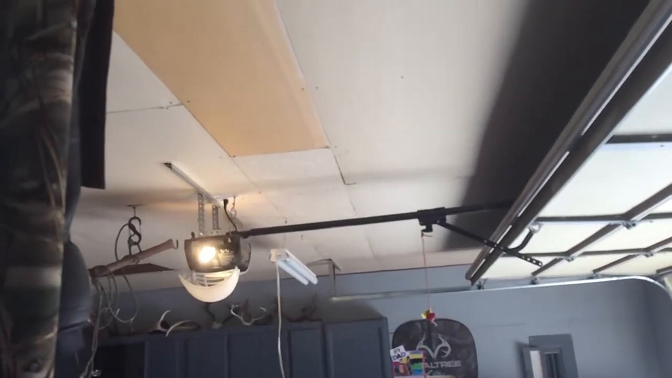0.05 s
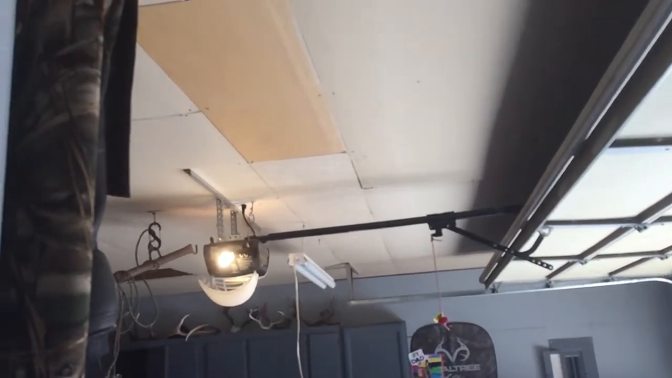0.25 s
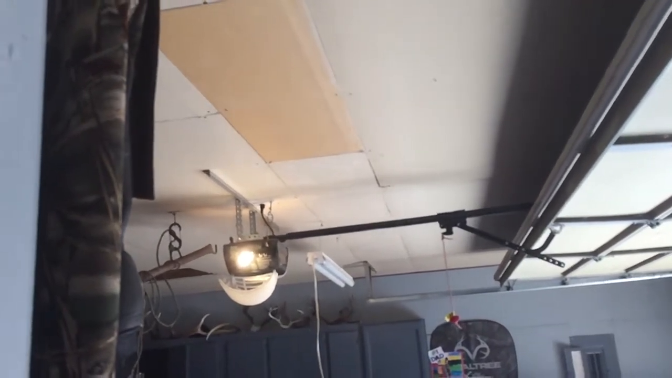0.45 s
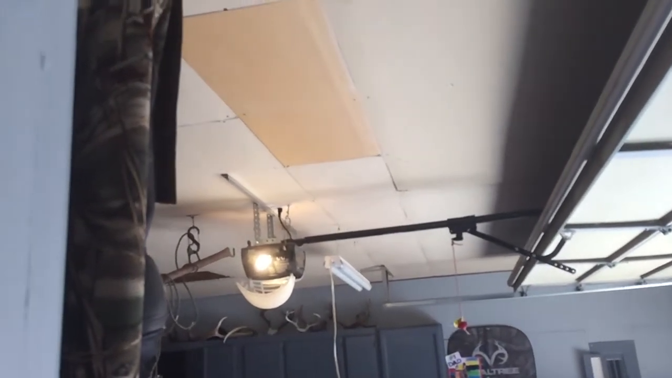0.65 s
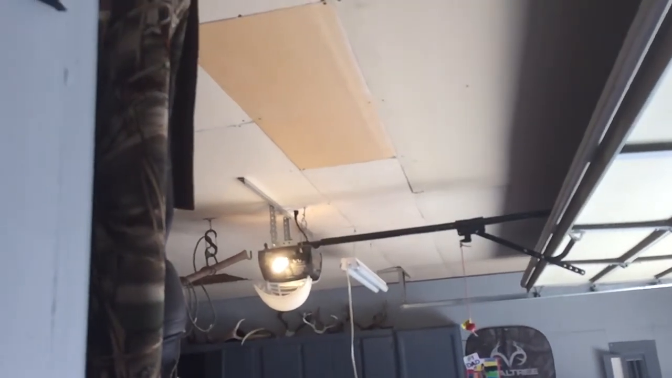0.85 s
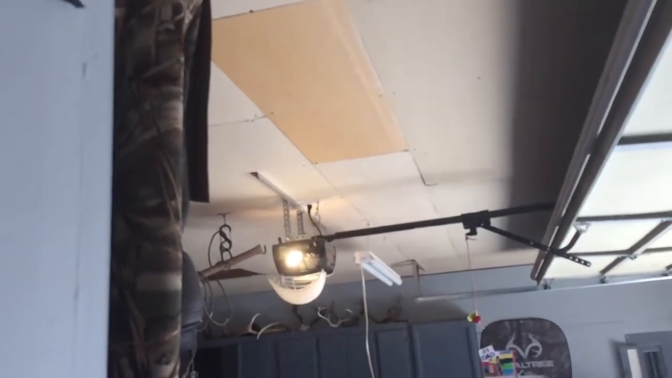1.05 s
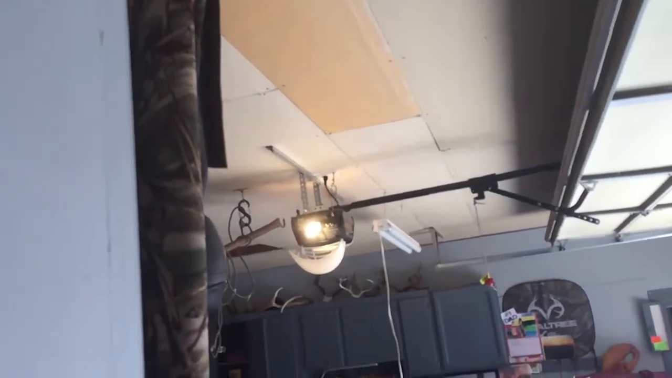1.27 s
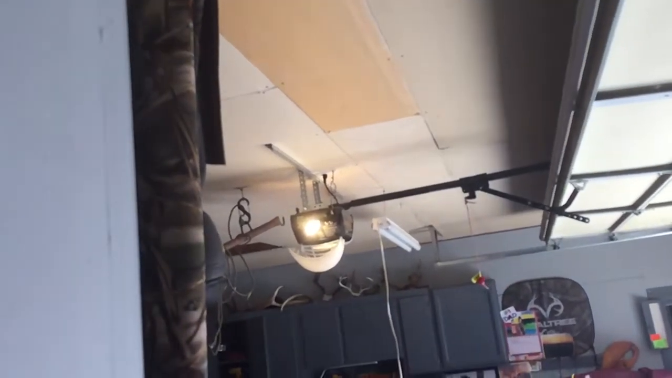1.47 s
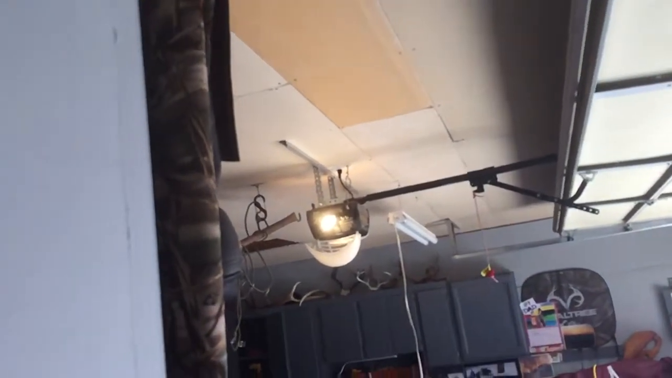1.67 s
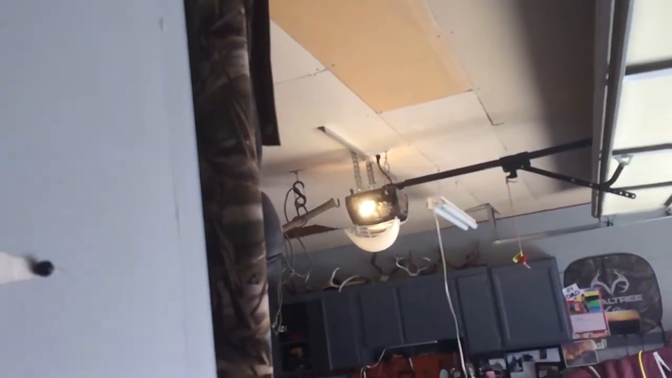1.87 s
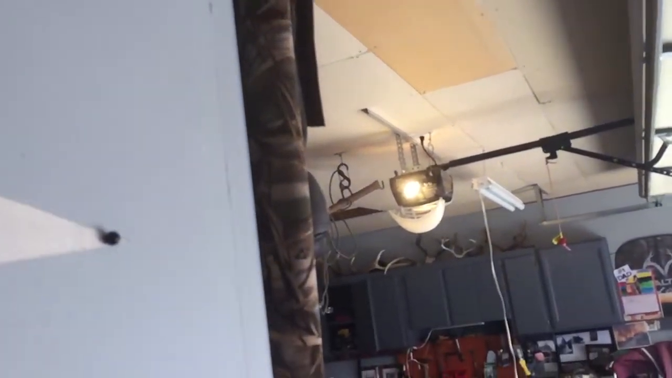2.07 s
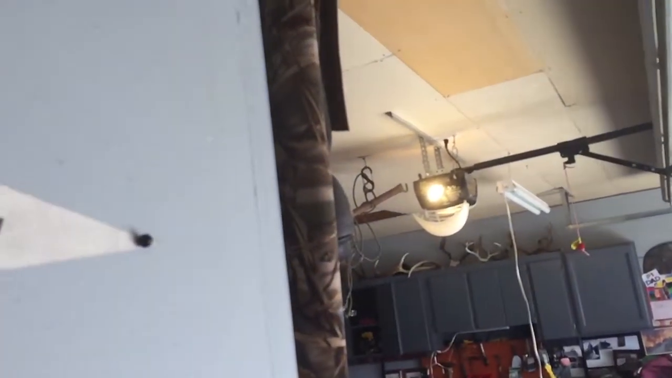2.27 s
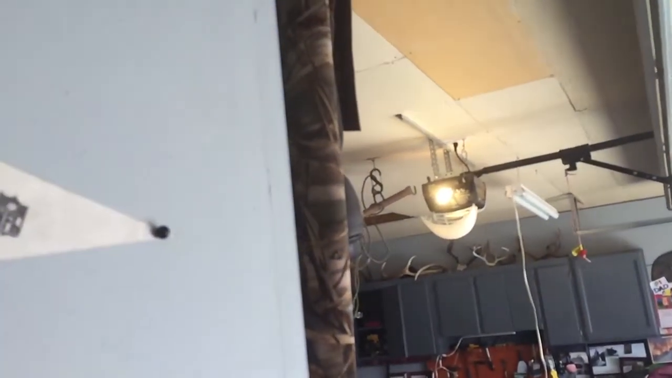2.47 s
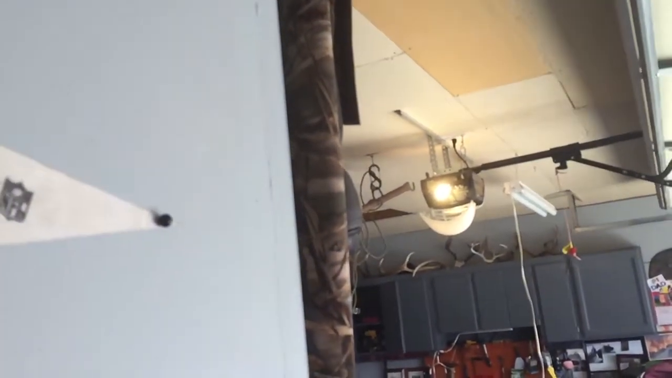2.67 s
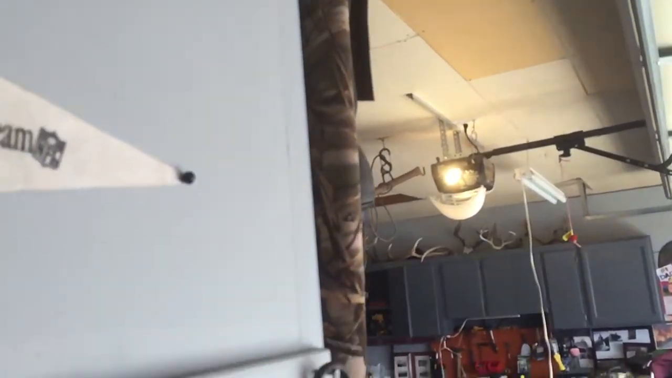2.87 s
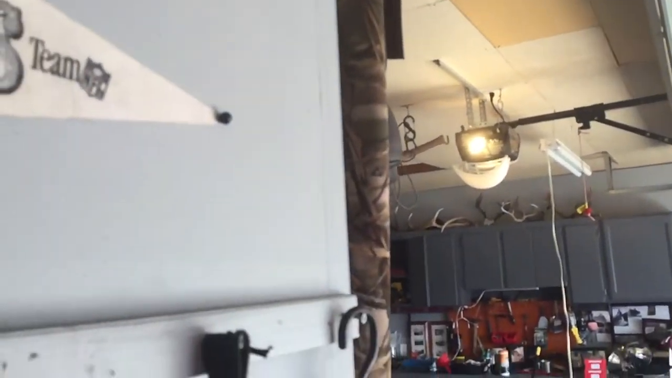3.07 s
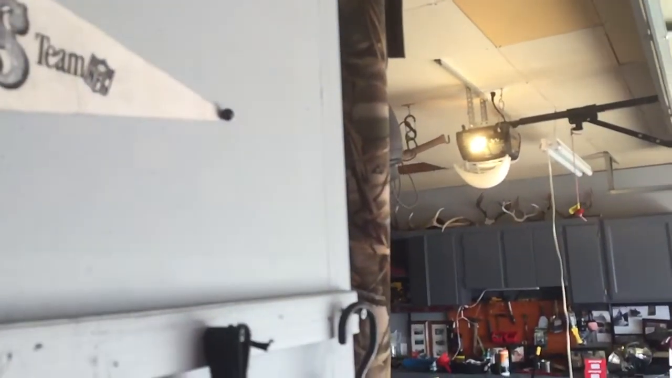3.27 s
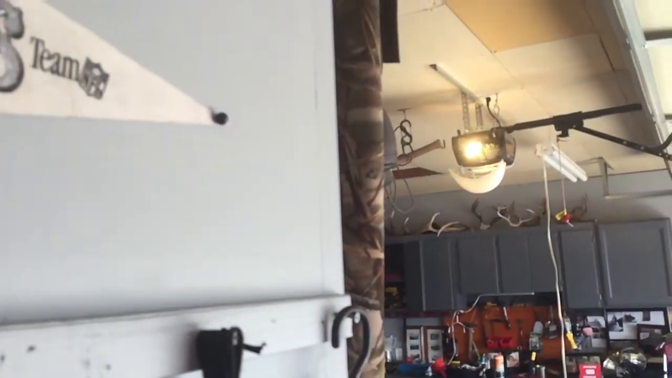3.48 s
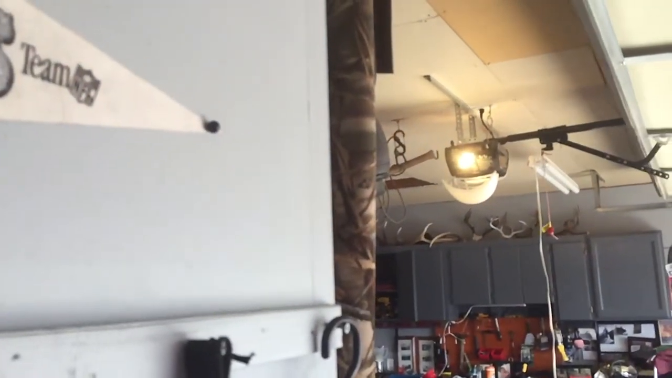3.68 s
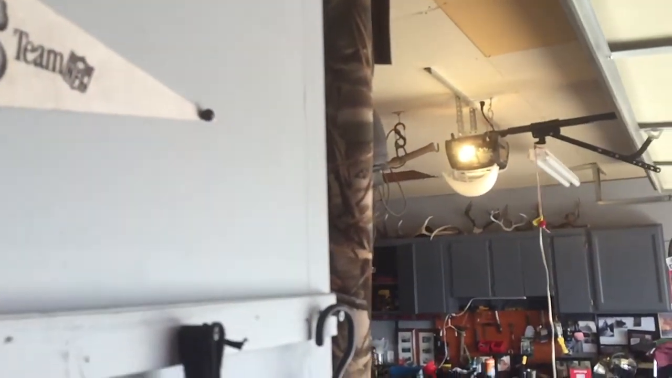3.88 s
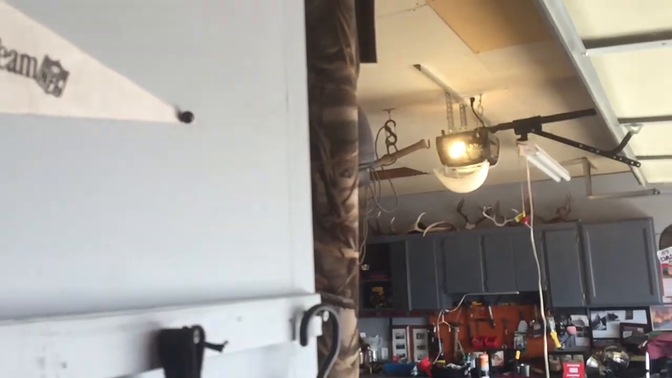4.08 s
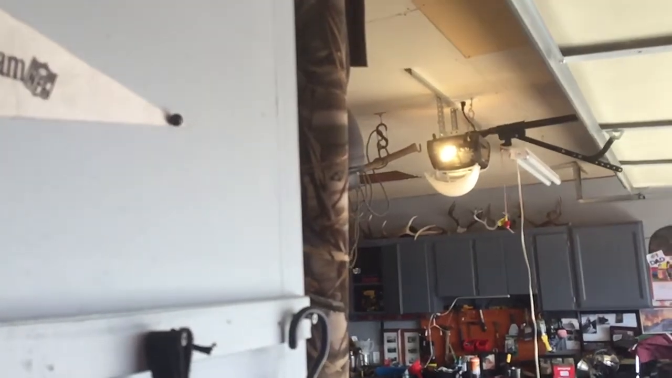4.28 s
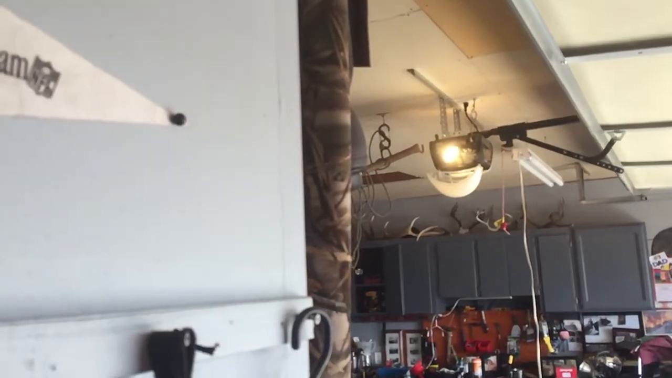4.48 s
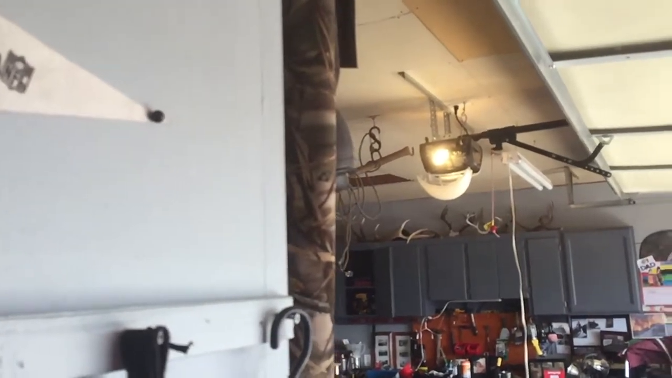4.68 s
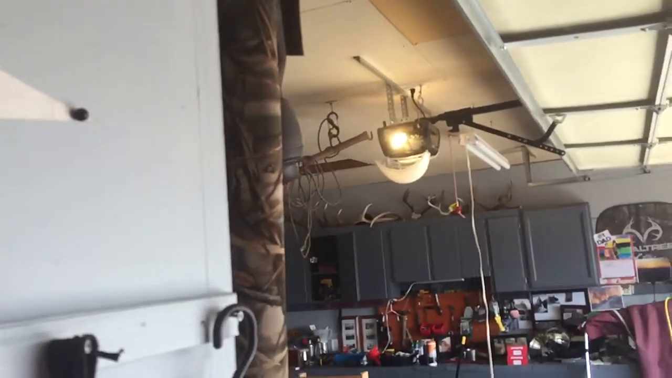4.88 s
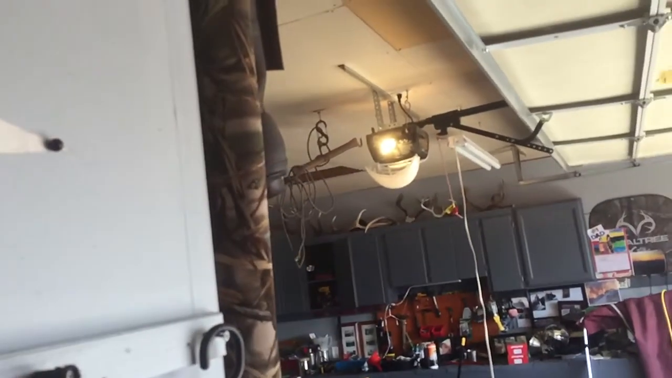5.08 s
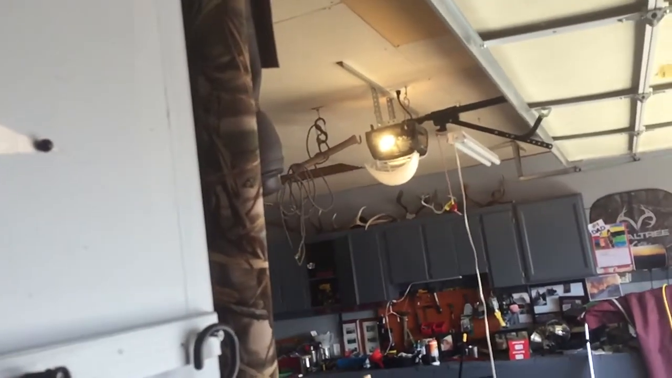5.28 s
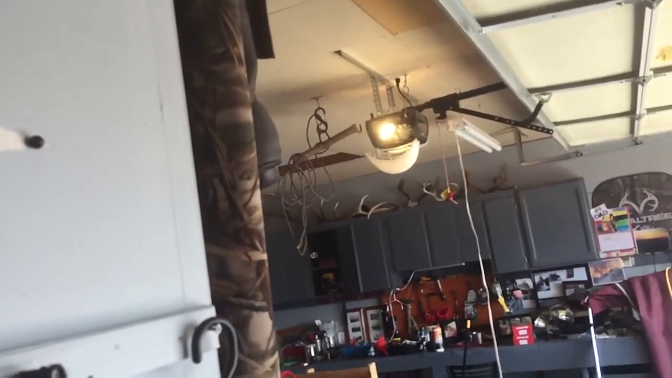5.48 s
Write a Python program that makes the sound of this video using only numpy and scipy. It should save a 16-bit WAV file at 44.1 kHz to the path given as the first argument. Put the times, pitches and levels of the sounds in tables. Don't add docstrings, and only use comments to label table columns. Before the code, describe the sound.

A handheld microphone picks up a garage door already moving: a strong mains-like motor hum, rumbling panels, dry roller and chain friction, scattered raps and dull thuds. A clanking burst passes about a quarter of the way through. After more uneven clicks, a cluster of thuds and bracket rattles marks the stop; the motor drops away quickly, leaving faint settling knocks and a short-reverberating quiet garage.

```python
import sys
import numpy as np
from scipy import signal
from scipy.fft import rfft, irfft, next_fast_len
from scipy.io import wavfile
from scipy.ndimage import uniform_filter1d, map_coordinates

SR = 44100
rng = np.random.default_rng(int(sys.argv[2]) if len(sys.argv) > 2 else 0)


def voltage_ratio(decibels):
    exponent = np.asarray(decibels, float) / 20
    return 10 ** exponent


def generate_wav(sig):
    pcm = np.round(np.clip(np.atleast_2d(sig).T, -1, 1) * 32767).astype(np.int16)
    wavfile.write(sys.argv[1], SR, pcm)


N = 244314


def unit(x):
    return x / np.sqrt(np.mean(x ** 2) + 1e-20)


def along(points, hz):
    f, v = np.transpose(points)
    return np.interp(np.log(hz + 1), np.log(f + 1), v)


def curves(rows):
    s, *columns = np.transpose(rows)
    return [np.interp(np.arange(N) / SR, s, column) for column in columns]


def wobble(rate):
    knots = rng.standard_normal(int(N * rate / SR) + 4)
    return map_coordinates(knots, [np.arange(N) * rate / SR])


def bumps(times, levels_db, t60s, rise):
    t = np.clip(np.arange(N) / SR - np.asarray(times)[:, None], 0, None)
    fall_db = np.asarray(levels_db)[:, None] - 60 * t / np.maximum(t60s, .02)[:, None]
    return np.sqrt((voltage_ratio(2 * fall_db) * (1 - np.exp(-t / rise)) ** 2).sum(0))


def filtered(x, response):
    m = next_fast_len(N + 8192)
    return unit(irfft(rfft(x, m) * response(np.fft.rfftfreq(m, 1 / SR)), m)[:N])


def band(spectrum, hz):
    return voltage_ratio(along(spectrum, hz)) * (hz > spectrum[0][0]) * (hz < spectrum[-1][0])


def coloured(spectrum, x=None):
    return filtered(rng.standard_normal(N) if x is None else x, lambda hz: band(spectrum, hz))


def grind(rate, spread_db, share, patchy_db):
    sizes = (rng.random(N) < rate / SR) * voltage_ratio(spread_db * np.minimum(rng.exponential(1, N), 3))
    puffs = signal.lfilter([1], [1, -np.exp(-1 / (.004 * SR))], sizes)
    z = signal.stft(rng.standard_normal(N), nperseg=1024)[2]
    rings = uniform_filter1d(rng.standard_normal(z.shape), size=2, axis=0)
    rings = uniform_filter1d(rings, size=9, axis=1)
    noise = signal.istft(z * voltage_ratio(patchy_db * unit(rings)), nperseg=1024)[1][:N]
    return noise * (1 + share * unit(puffs))


# start_s, hum_db, strain_db
MOTOR_LOAD = [(0, -29, -2), (.41, -28, -5.5), (.76, -29.5, 6.5), (1.21, -26.5, -2), (2.27, -28, 1.5),
              (2.32, -30, 3), (2.82, -29.5, 5.5), (2.96, -31, 7), (3.37, -29, 7), (3.48, -30.5, 7.5),
              (3.92, -31, 11), (3.97, -34, 18), (3.995, -30, 9), (4.2, -31, 1), (4.362, -32.5, 12)]
HUM_HZ, SAG_HZ_PER_S = 119.9, 235
SECOND_DB, THIRD_DB, THIRD_STRAIN = -32.5, -33.5, -0.66
CUT_S, CUT_DROP_DB, COAST_DB_PER_S, COAST_S = 0.0062, 6, 70, 0.15


def motor():
    t = np.arange(N) / SR
    after = t - MOTOR_LOAD[-1][0]
    coasting = np.maximum(after, 0)
    turn = 2 * np.pi * HUM_HZ * t - np.pi * SAG_HZ_PER_S * coasting ** 2
    hum_db, strain_db = curves(MOTOR_LOAD)
    cut_db = CUT_DROP_DB * np.clip(after / CUT_S, 0, 1) + COAST_DB_PER_S * coasting
    second_db = hum_db + SECOND_DB + strain_db
    third_db = hum_db - cut_db + THIRD_DB + THIRD_STRAIN * strain_db
    hum = np.zeros(N)
    for k, db, depth_db, slip in [(1, hum_db - cut_db, .4, .04), (2, second_db, .7, .09),
                                  (3, third_db, 1.4, .15)]:
        hum += voltage_ratio(db + depth_db * wobble(24.95)) * np.sin(k * turn + slip * wobble(29))
    return np.sqrt(2) * hum * np.clip((COAST_S - after) / 0.016, 0, 1)


# start_s, level_db
SHAKE = [(0, -43.5), (.2, -49.5), (.54, -52.5), (.8, -51), (1.05, -49.5), (1.25, -50.5), (1.9, -52.5),
         (2.1, -50), (2.6, -51.5), (3, -49.5), (3.4, -51), (3.85, -51.5), (4.08, -47), (4.3, -46),
         (4.42, -44.5), (4.6, -49), (4.81, -59), (4.85, -87)]
# start_s, boom_db, drum_db, t60_s
LURCHES = [(0, -50, -44, 0.79), (.63, -32, -36.5, .4), (0.751, -39, -67.5, 0.67), (1.19, -41, -39, 0.33),
           (2.95, -39, -43, 0.33), (3.47, -52, -39, 0.44), (3.88, -55, -40, 0.79), (4.21, -60, -30, 0.4),
           (4.3, -53, -32, 0.36), (4.344, -18.5, -21, 0.091), (4.72, -50, -56.5, 0.44),
           (4.93, -48, -72, 0.21), (5.2, -65, -79, 1)]
# pitch_hz, width_hz, level_db
PANEL_MODES = [(145, 10, 7), (216, 66, -4.5), (279.5, 34.5, -6.5), (385, 88, -9.5)]
# pitch_hz, level_db_per_hz
BOOM_SPECTRUM = [(20, -48), (32, -25), (42, -7), (55, -6.5), (70, 4), (95, 1), (125, -0.5), (170, -52.5)]
DRUM_DB, DRUM_GROWS, SWAY_DB = -1, 1.18, 2
DRUM_STOP_S, DRUM_STOP_DB_PER_S = 4.456, 36


def panel_response(f):
    modes = 0
    for k, (c, w, db) in enumerate(PANEL_MODES):
        modes = modes + (-1) ** k * voltage_ratio(db) * 1j * f * w / (c * c - f * f + 1j * f * w)
    return modes / (1 + (135 / (f + 1)) ** 12) / (1 + (f / 470) ** 8)


def panels():
    shake_db, = curves(SHAKE)
    slack_db = DRUM_STOP_DB_PER_S * np.maximum(np.arange(N) / SR - DRUM_STOP_S, 0)
    s, boom_db, drum_db, t60 = np.transpose(LURCHES)
    boom = np.hypot(voltage_ratio(shake_db + SWAY_DB * wobble(11)), bumps(s, boom_db, t60, rise=0.019))
    steady_drum_db = DRUM_GROWS * (shake_db + 51.5) - 51 + DRUM_DB - slack_db
    beat = np.hypot(voltage_ratio(steady_drum_db), bumps(s, drum_db, t60, rise=0.036))
    drum = filtered(rng.standard_normal(N) * voltage_ratio(1.93 * wobble(18)), panel_response)
    return boom * coloured(BOOM_SPECTRUM) + beat * drum


# pitch_hz, width_hz, level_db
RAIL_MODES = [(781, 13, -3), (860, 44, -5), (1105, 35, -9.5), (1266, 21, -1.5), (1405, 10, -4.5),
              (1745, 19, -1.5), (2300, 31, -1.5), (2547, 67, 3), (2826, 140, -6), (3209, 25, 0),
              (3770, 39, -0.5), (4530, 43, -1.5), (6540, 67, -5), (6900, 56, 4)]


def railed(spectrum, x):
    def response(f):
        peaks = 1 + sum(voltage_ratio(db) * w * w / (w * w + 4 * (f - c) ** 2) for c, w, db in RAIL_MODES)
        return peaks * band(spectrum, f)
    return filtered(x, response)


# start_s, level_db
DRAG = [(0, -56.5), (.23, -57), (.3, -51), (.54, -61), (.75, -55.5), (1.1, -62.5), (1.2, -52.5),
        (1.4, -53.5), (1.6, -48), (1.8, -48.5), (2.26, -54), (2.46, -58), (2.81, -57.5), (3.3, -55.5),
        (3.86, -57), (4.15, -50.5), (4.44, -48), (4.56, -60.5)]
# start_s, level_db, t60_s, extra_chain_db
JOLTS = [(0, -28, 0.016, 12), (.044, -43.5, 0.34, 1.5), (0.599, -45, 0.35, 4.5), (.655, -40.5, 0.13, -19),
         (1.12, -44.5, 0.29, 2), (1.23, -59, 1.5, 10), (1.31, -47.5, 0.19, 2), (1.49, -55.5, 1.3, 12.5),
         (1.57, -53, 0.21, 0), (1.635, -53.5, 0.69, 11.5), (2.82, -54.5, 1.7, 3), (3.08, -52.5, 0.54, -13),
         (3.23, -61.5, 2.1, 10.5), (4.08, -61, 0.45, 18.5), (4.211, -46.5, 0.5, 10),
         (4.32, -47.5, 0.35, 8.5), (4.39, -54, 0.28, 16), (4.606, -64, 0.79, -3)]
# pitch_hz, level_db_per_hz
ROLLER_SPECTRUM = [(250, -34), (430, -16.5), (484, -5), (600, 0), (820, 2), (1050, -1), (1450, 0),
                   (1890, -4), (2300, -6), (2990, -43), (5060, -120)]
# pitch_hz, level_db_per_hz
GEAR_SPECTRUM = [(1120, -35), (1900, -12.5), (2790, 1.5), (3190, -2.5), (3400, -1), (3920, -9), (4250, -10),
                 (4760, -36), (5200, -29), (6760, -54), (11400, -120)]
# pitch_hz, level_db_per_hz
CHAIN_SPECTRUM = [(2710, -30.5), (4600, -1.5), (5040, -2.5), (5580, 1.5), (6310, 0.5), (6850, -4.5),
                  (9490, -7.5), (10200, -15), (11700, -13.5), (15600, -17.5)]
MEAN_DRAG_DB, GEAR_DB, GEAR_GROWS, CHAIN_DB, CHAIN_GROWS = -54, -59.5, 0.33, -72, 0.28
REST_DB_PER_S = 60
GEAR_STOP_S, GEAR_STOP_DB_PER_S = 4.48, 128
CHAIN_STOP_S, CHAIN_STOP_DB_PER_S = 4.52, 70
JOLT_GEAR_DB, JOLT_CHAIN_DB, JOLT_RISE_S = -10.5, -18.5, 0.0071


def travel():
    t = np.arange(N) / SR
    drag_db = curves(DRAG)[0] - REST_DB_PER_S * np.maximum(t - DRAG[-1][0], 0)
    s, db, t60, bright_db = np.transpose(JOLTS)
    joints = bumps(s, db, t60, rise=JOLT_RISE_S)
    rattles = bumps(s, db + bright_db, t60, rise=JOLT_RISE_S)
    extra_db = drag_db - MEAN_DRAG_DB
    gear_db = GEAR_DB + GEAR_GROWS * extra_db - GEAR_STOP_DB_PER_S * np.maximum(t - GEAR_STOP_S, 0)
    chain_db = CHAIN_DB + CHAIN_GROWS * extra_db - CHAIN_STOP_DB_PER_S * np.maximum(t - CHAIN_STOP_S, 0)
    jerk_db = .5 * wobble(14) + 1.4 * wobble(36)
    rolling = grind(120, 2.5, share=.08, patchy_db=2)
    rattle = grind(90, 3, share=.2, patchy_db=2.4)
    roller_gain = np.hypot(voltage_ratio(drag_db), joints) * voltage_ratio(.3 * jerk_db)
    gear_gain = np.hypot(voltage_ratio(gear_db), voltage_ratio(JOLT_GEAR_DB) * joints) * voltage_ratio(0.14 * jerk_db)
    chain_gain = np.hypot(voltage_ratio(chain_db), voltage_ratio(JOLT_CHAIN_DB) * rattles) * voltage_ratio(.5 * jerk_db - 1.5)
    rollers = roller_gain * railed(ROLLER_SPECTRUM, rolling)
    gear = gear_gain * railed(GEAR_SPECTRUM, rattle)
    chain = chain_gain * railed(CHAIN_SPECTRUM, rattle)
    return rollers + gear + chain


# pitch_hz, level_db_per_hz
AIR_SPECTRUM = [(15, -35.5), (25, -7), (82, -3), (178, -16), (253, -11.5), (322, -18), (649, -20.5),
                (784, -21.5), (1850, -25.5), (4050, -30), (4890, -32.5), (9080, -36), (15600, -43)]


def still_air():
    return voltage_ratio(-67.5 + 0.73 * wobble(12.0)) * coloured(AIR_SPECTRUM)


# start_s, level_db, t60_s
SCRAPES = [
    (.043, -64.5, 0.11),
    (.595, -57.5, 0.039),
    (.634, -73, 0.17),
    (4.07, -68, 0.098),
    (4.08, -79, 3.2),
    (4.205, -63.5, 0.23),
    (4.27, -65, 0.58),
    (4.385, -77, .4),
]
# pitch_hz, level_db_per_hz
SCRAPE_SPECTRUM = [(9500, -48), (11000, 0), (12300, -2.5), (13100, -1), (14200, -2.5), (15700, -7.5),
                   (15900, -52)]


def scrape():
    return bumps(*np.transpose(SCRAPES), rise=.0015) * coloured(
        SCRAPE_SPECTRUM, grind(150, 4, share=0.52, patchy_db=-2.5))


def ring(s, db, hz, t60, attack):
    t = np.arange(SR // 4) / SR
    wave = np.sin(2 * np.pi * hz * t) * (1 - np.exp(-t / attack))
    return round(s * SR), voltage_ratio(db - 60 * t / max(t60, .008)) * wave


def together(struck):
    out = np.zeros(N + SR)
    for at, wave in struck:
        out[at:at + len(wave)] += wave
    return out[:N]


SHORTENS = 0.36
SPLIT, SPLIT_DB = .09, -12.5


def light_knocks(rows):
    beside = [(s, db + SPLIT_DB, hz * (1 + side * SPLIT)) for s, db, hz in rows for side in (-1, 1.4)]
    return together([ring(s, db, hz, 0.073 * (900 / hz) ** SHORTENS, attack=max(1.6 / hz, 0.0013))
                     for s, db, hz in rows + beside])


# start_s, level_db, pitch_hz
LINKS = [(0.0437, -44, 6100), (0.5955, -39, 5780), (0.6234, -56, 6530), (0.6344, -53, 6630),
         (0.9527, -54, 5890), (1.1144, -53, 8300), (1.2436, -49.5, 6600), (1.3947, -58, 6480),
         (1.474, -31, 7020), (1.6117, -34, 6060), (2.154, -47, 5800), (2.154, -48, 6240),
         (2.3101, -54, 6730), (2.4194, -58, 6040), (2.5396, -54, 6060), (2.6928, -54, 6300),
         (2.7374, -49, 7050), (2.821, -51, 6100), (2.8818, -47, 6450), (2.933, -51, 5860),
         (2.9966, -51, 6940), (3.0495, -59, 6100), (3.1776, -60, 6250), (3.195, -50, 6200),
         (3.2335, -52, 7300), (3.6451, -49, 5910), (3.7778, -58, 6400), (3.927, -52, 6250),
         (4.0734, -37.5, 6000), (4.2113, -44, 6300), (4.3294, -49, 6600), (4.6049, -65, 6200),
         (4.7616, -53, 5900)]
PING_DB, OVER, OVER_DB = -10, 1.62, -14.5


def chain_links():
    first = [(s, db + PING_DB, hz) for s, db, hz in LINKS]
    second = [(s, db + OVER_DB, OVER * hz) for s, db, hz in first]
    return light_knocks(first + second)


# pitch_hz, level_db_per_hz
KNOCK_SPECTRUM = [(350, -36), (600, -3), (900, -5), (1500, -2.5), (2100, -12), (3000, -46)]
# pitch_hz, level_db_per_hz
BODY_SPECTRUM = [(1500, -37), (2200, 1.5), (3000, 0), (4200, -2.5), (5200, -17.5), (7000, -37)]
# pitch_hz, level_db_per_hz
EDGE_SPECTRUM = [(4000, -33.5), (5500, 4), (7000, -0.5), (9500, -5), (10800, -12), (13000, -9.5),
                 (15800, -27.5)]


def contacts(rows, t60, hard):
    t, out = np.arange(SR // 3) / SR, np.zeros(N + SR)
    layers = [coloured(KNOCK_SPECTRUM), coloured(BODY_SPECTRUM), coloured(EDGE_SPECTRUM)]
    layers = np.pad(layers, ((0, 0), (0, SR)))
    life = t60 * np.array([[1.3], [.95], [.6]])
    crack = 0.56 + hard * np.exp(-t / 0.003)
    onset = 1 - np.exp(-t / 0.00071)
    for s, db, knock_db, edge_db in rows:
        at = round(s * SR)
        balance_db = np.array([[knock_db], [0], [edge_db + 4 * hard]])
        shape = voltage_ratio(db - 10.5 + balance_db - 60 * t / life) * onset * crack
        out[at:at + len(t)] += (shape * layers[:, at:at + len(t)]).sum(0)
    return out[:N]


# start_s, level_db, knock_db, edge_db
TICKS = [(0.044, -37, -0.5, -21), (.596, -35.5, -8, -23), (0.9528, -39, -1.5, -16),
         (1.1154, -39, 3.5, -16.5), (1.393, -40.5, -4, -16.5), (1.4722, -38.5, 0, -3),
         (1.61, -29.5, -11, -15), (2.1531, -39, -18, -6.5), (2.31, -55.5, -7, -8.5),
         (2.4189, -48, -11, -14), (2.5365, -46, -2, -19.5), (2.6894, -51, 5, -13), (2.7408, -45, -1, -12.5),
         (2.82, -39.5, 1.5, -16.5), (2.8842, -43, -1, -8.5), (2.9344, -49, -9, -18), (2.997, -45, -1.5, -9),
         (3.0496, -45.5, -6, -9), (3.076, -40.5, 2, -17.5), (3.1765, -44.5, -10, -11),
         (3.6401, -41.5, -21, -19.5), (3.78, -57, -7, -1), (4.0732, -37.5, 3, -12), (4.2103, -37.5, 6, -19),
         (4.315, -38.5, 12, -14), (4.5553, -51, -3, -14), (4.606, -49, 5, -16), (4.761, -54, -7, -8)]


def ticks():
    return contacts(TICKS, t60=0.15, hard=1)


# start_s, level_db, pitch_hz
RAPS = [(0.045, -40, 857), (0.247, -50, 1730), (0.29, -48, 678), (0.335, -48, 640), (0.397, -36.5, 712),
        (0.597, -40, 1564), (0.953, -37.5, 2226), (1.08, -47.5, 650), (1.115, -39, 662), (1.69, -42, 864),
        (1.741, -32, 876), (1.846, -45, 740), (1.905, -36.5, 876), (2.048, -34, 1116), (2.182, -48, 626),
        (2.246, -39.5, 720), (2.387, -40, 760), (2.502, -48.5, 789), (2.604, -48, 836), (2.632, -45, 670),
        (2.738, -45, 640), (3.239, -41, 890), (3.335, -52, 1050), (3.487, -38, 676), (3.542, -41.5, 2150),
        (3.57, -52, 799), (3.971, -49, 680), (4.074, -39.5, 651)]


def roller_raps():
    return light_knocks([(s, db - 7.5, hz) for s, db, hz in RAPS])


# start_s, level_db, pitch_hz
THUDS = [(.05, -46, 193), (.06, -38, 268), (0.629, -44, 435), (.652, -27, 150), (0.656, -44, 478),
         (1.701, -33.5, 160), (0.082, -29, 162.5), (0.627, -25, 160), (0.651, -36, 216),
         (1.119, -37.5, 380), (1.729, -40, 387), (2.255, -26, 154), (2.256, -39.5, 402),
         (2.844, -26.5, 163), (2.848, -38.5, 397), (3.31, -40, 385), (3.369, -39.5, 396),
         (3.483, -36.5, 385), (3.508, -43, 395), (3.486, -31.5, 154), (3.963, -40, 160),
         (3.972, -37.5, 354), (4.046, -41, 360), (4.076, -32.5, 374), (4.097, -34.5, 385), (4.2, -29, 227),
         (4.213, -25.5, 223), (4.232, -27, 201), (4.282, -35, 233), (4.319, -35, 427), (4.22, -32.5, 488),
         (4.238, -25, 147), (4.324, -36, 141), (4.41, -43, 400), (4.715, -44, 192), (4.75, -48.5, 215),
         (4.79, -57, 104), (4.93, -52, 103), (4.94, -73, 140), (5.275, -48, 76)]


def thuds():
    return together([ring(s, db, hz, 0.12 * (160 / hz) ** SHORTENS, attack=1.0 / hz)
                     for s, db, hz in THUDS])


# start_s, level_db, knock_db, edge_db
SCUFFS = [(.098, -47, -11, -17), (0.133, -42, -9, -25), (0.384, -41, -13, -18), (0.6352, -40, 4, -16),
          (0.776, -58, -22, -31), (.823, -57, -12, -37), (1.3366, -46, -9, -37), (3.099, -43, -1, -40),
          (3.237, -32.5, -12, -16), (3.33, -37, -21, -27), (3.431, -35.5, -5, -32),
          (3.5072, -34.5, -1.5, -18), (4.083, -36, -16, -17), (4.2456, -55, 9, -2), (4.2794, -57, -4, -20),
          (4.311, -41, 0, -15), (4.3437, -61, -2, -20), (4.39, -41.5, 7, -7.5), (4.4286, -46, 2, -28)]


def scuffs():
    return contacts(SCUFFS, t60=0.18, hard=0.086)


# start_s, level_db, t60_s, pitch_hz, width_hz
SKIDS = [
    (.2, -61, 2, 560, 120),
    (1.46, -68, 1.2, 6950, 500),
    (1.5, -55.5, 1, 1850, 300),
    (1.55, -58, 0.94, 775, 60.3),
    (1.85, -54.5, 1.3, 1380, 248),
    (1.95, -61.5, 0.87, 1130, 80.4),
    (3.2, -55, 1.5, 380, 60.3),
    (3.85, -70, 1.7, 7000, 3000),
    (4.1, -56.5, 0.87, 2320, 500),
]


def skids():
    noise, out = rng.standard_normal(N), np.zeros(N)
    for s, db, t60, hz, width in SKIDS:
        resonance = signal.iirpeak(hz, hz / max(width, 20), SR)
        out += bumps([s], [db], [t60], rise=0.042) * unit(signal.lfilter(*resonance, noise))
    return out


# start_s, level_db
CLANKS = [
    [(1.474, -35), (1.477, -29.5), (1.483, -34), (1.489, -36.5), (1.5, -37)],
    [(1.6116, -30.5), (1.6133, -25), (1.6158, -28.5), (1.62, -38)],
]
# pitch_hz, level_db, t60_s
ARM_MODES = [
    [(2310, -15, .015), (2550, -1.5, 0.016), (2810, -7.5, 0.077), (2860, -9, 0.014), (3920, -14, 0.025)],
    [(960, -3, 0.02), (1740, -5, 0.023), (2200, -9, 0.022), (2940, 3, 0.016), (3160, -9, 0.012),
     (3760, -2, 0.013), (3720, -23, 0.016), (4700, -9.5, 0.013)],
]


def clanks():
    struck = []
    for hits, modes in zip(CLANKS, ARM_MODES):
        for s, db in hits:
            for hz, level_db, t60 in modes:
                struck.append(ring(s, db + level_db + rng.normal(0, 2), hz * rng.normal(1, .012), t60,
                                   attack=0.00024))
    return together(struck)


# start_s, level_db, pitch_hz
MORE_KNOCKS = [(1.617, -54, 800), (1.632, -42, 750), (1.657, -40, 783), (1.668, -38, 770), (1.476, -51, 7700),
               (1.612, -45, 8100), (2.823, -39, 900), (2.824, -45.5, 1515), (3.076, -41, 1370),
               (3.079, -43, 900), (3.094, -45, 1066), (4.21, -35.5, 1083), (4.228, -37, 893),
               (4.212, -40, 714), (4.308, -41, 1630), (4.32, -28.5, 867), (4.326, -36, 1010),
               (4.334, -34, 727), (4.345, -39, 1070), (4.243, -42, 1350), (4.255, -45, 1125),
               (4.275, -42, 954), (4.402, -43, 1450), (4.39, -39, 1650), (4.551, -48, 934), (4.604, -43, 1830),
               (4.607, -52, 2760), (4.611, -63, 1460), (4.624, -51, 1170), (4.668, -49.5, 950),
               (4.684, -55, 1040), (4.7, -49, 906), (4.72, -58, 960), (4.73, -58, 635)]


def roller_knocks():
    return light_knocks(MORE_KNOCKS)


# start_s, level_db, pitch_hz
SQUEAKS = [
    (4.262, -72, 12960),
    (4.285, -57, 13160),
]


def squeak():
    t, out = np.arange(N) / SR, np.zeros(N)
    for s, db, hz in SQUEAKS:
        whistle = np.sin(2 * np.pi * hz * t + 1.4 * wobble(150))
        out += bumps([s], [db], [.2], rise=.012) * whistle
    return out


# pitch_hz, t60_s
GARAGE_T60 = [(150, 1), (2000, 0.33), (10000, 0.2)]


def garage(x):
    hz, t, z = signal.stft(rng.standard_normal(SR // 2), SR, nperseg=256)
    fading = z * voltage_ratio(-60 * t / along(GARAGE_T60, hz)[:, None])
    tail = signal.istft(fading, SR, nperseg=256)[1]
    delayed = np.pad(x, (300, 0))
    return signal.fftconvolve(delayed, tail / np.linalg.norm(tail))[:N]


def scene():
    steady = motor() + panels() + travel() + still_air()
    hits = chain_links() + ticks() + roller_raps() + thuds() + scuffs() + clanks() + roller_knocks()
    rubbing = scrape() + skids() + squeak()
    return (steady + hits + rubbing + voltage_ratio(-15.0) * garage(hits))[None]


def low_pass(x):
    return signal.sosfilt(signal.butter(12, 15700, fs=SR, output="sos"), x)


def record(dry):
    lowpass = signal.butter(12, 15750, fs=SR, output="sos")
    mix = signal.sosfiltfilt(lowpass, dry)
    return low_pass(mix)


dry = scene()
out = record(dry)
generate_wav(out)
```